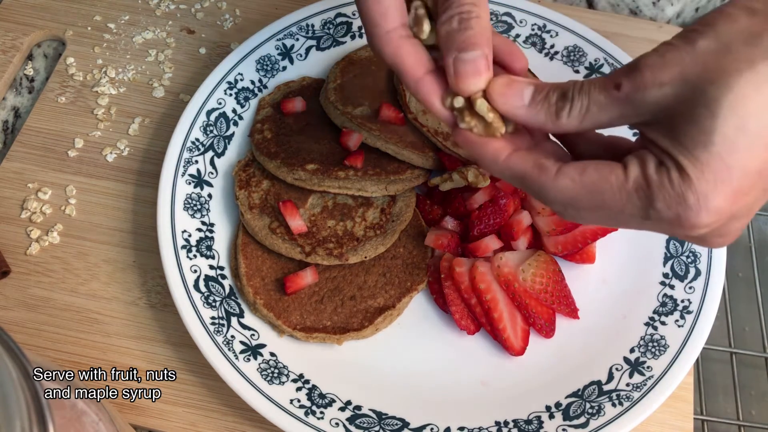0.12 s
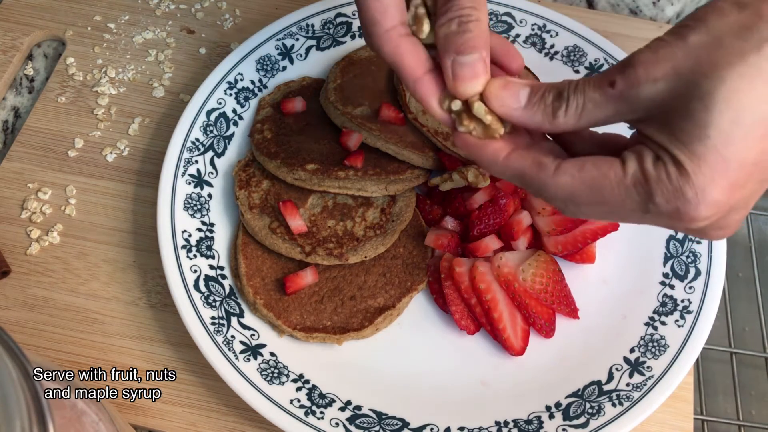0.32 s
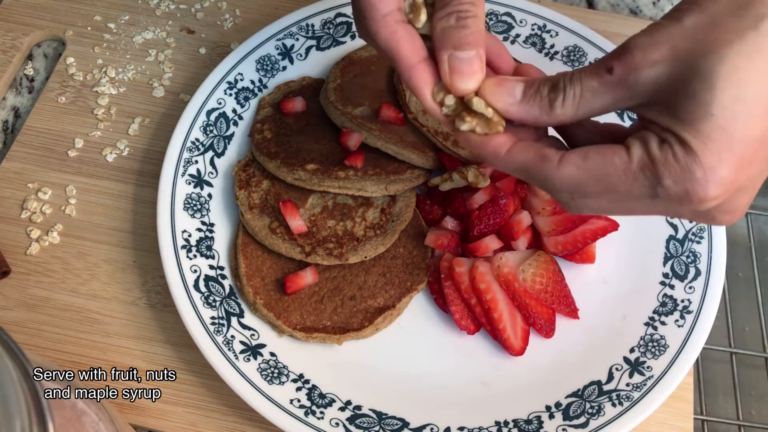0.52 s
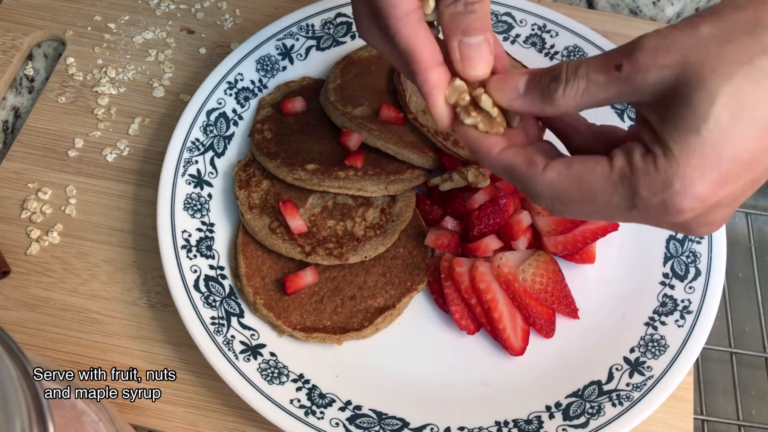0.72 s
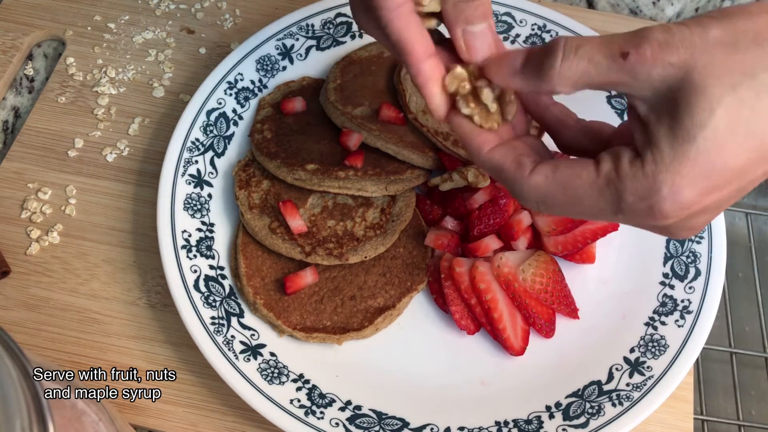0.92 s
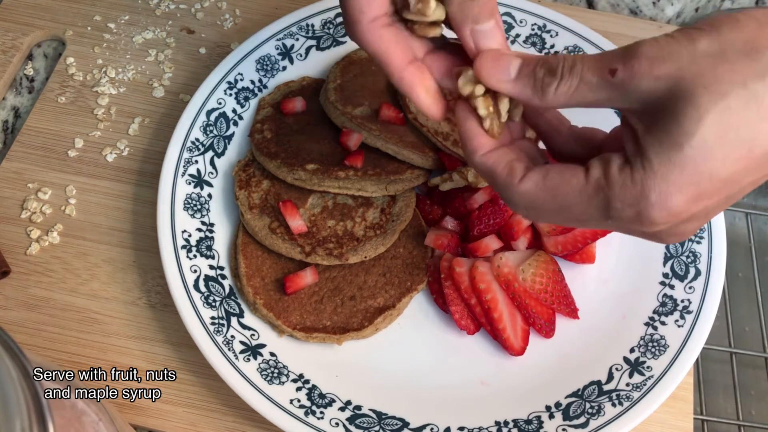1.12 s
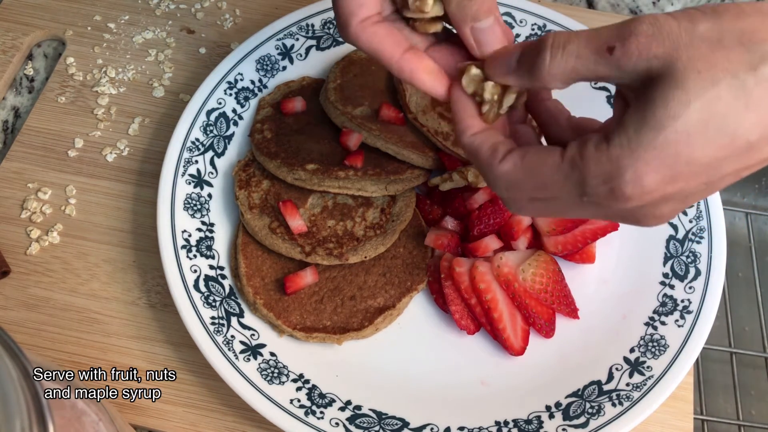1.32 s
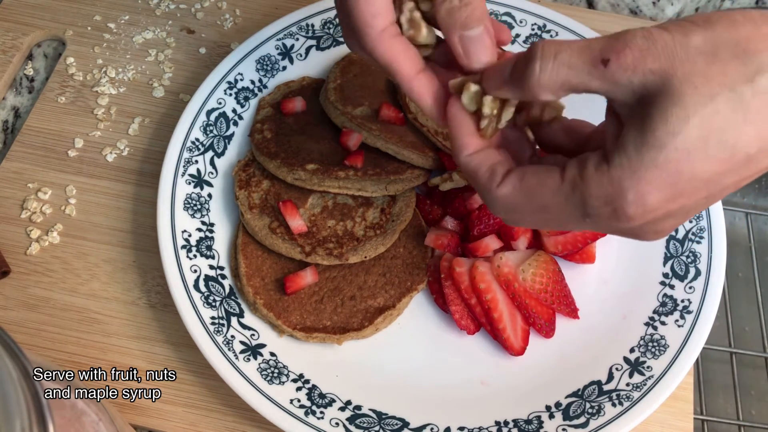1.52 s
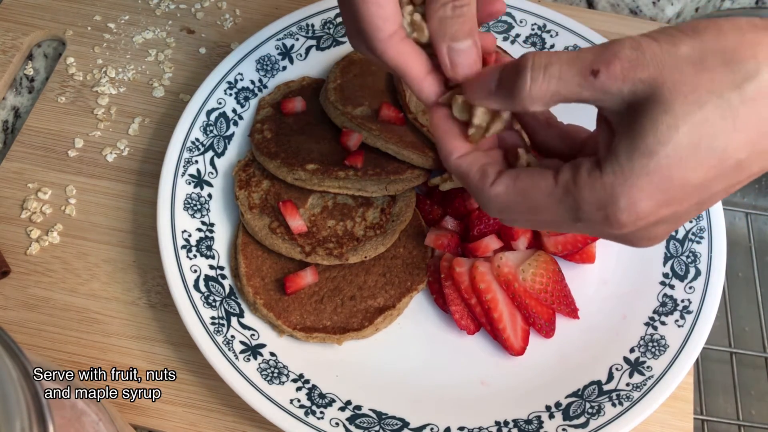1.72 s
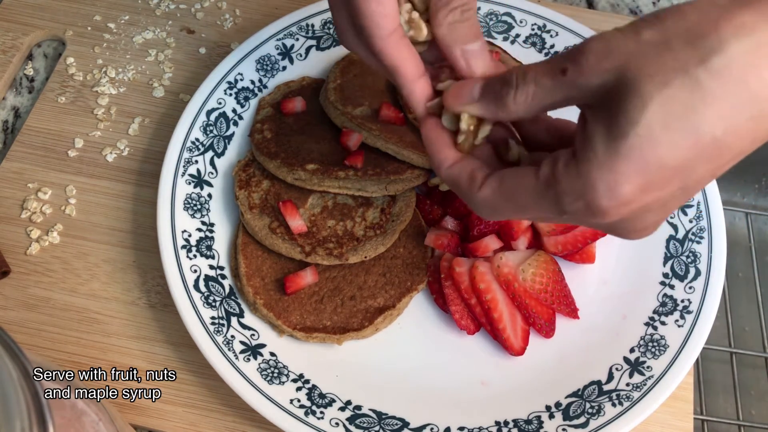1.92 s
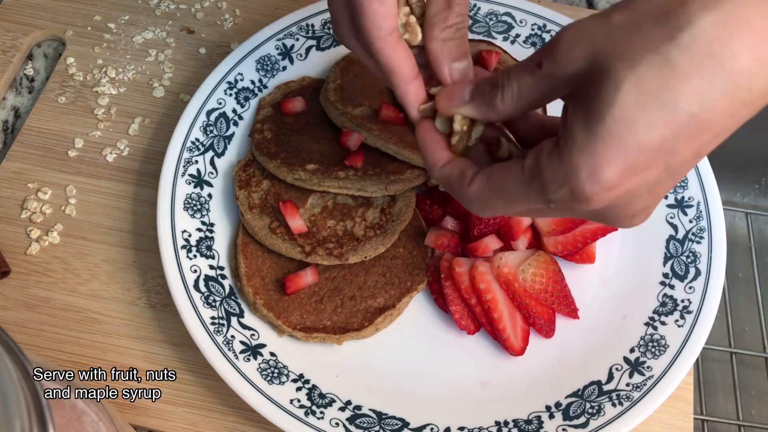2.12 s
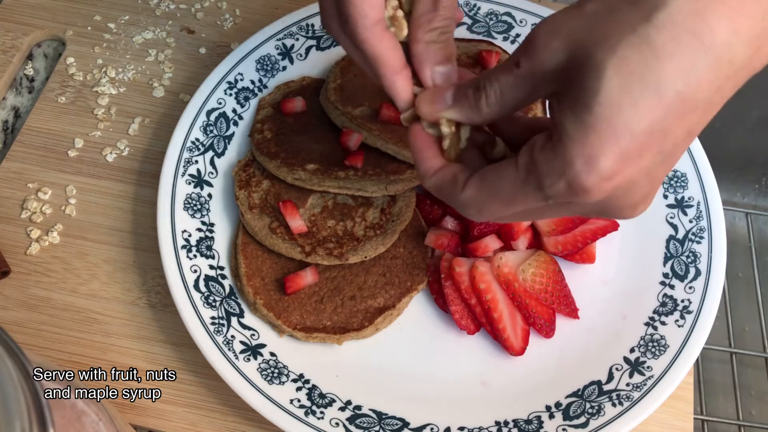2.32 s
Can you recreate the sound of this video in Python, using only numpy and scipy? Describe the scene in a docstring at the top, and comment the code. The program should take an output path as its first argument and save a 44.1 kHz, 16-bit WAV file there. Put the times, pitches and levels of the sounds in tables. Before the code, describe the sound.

Dry, bright cracks of nut kernels broken by hand, close up, in a quiet kitchen

```python
"""In a quiet kitchen, fingers break walnut pieces over a plate of pancakes, close to the microphone.
Each break is a dying burst of tiny slips that rings the kernel; crumbs tick the same way, more softly.
Friction grains make the rubbing, and shaped noise a dull brush of the hand.
Hands, plate and room answer these sounds by convolution with decaying noise.
Filtered noise and sines supply a low rumble, faint hiss, mains hum and soft low tones."""
import sys
import numpy as np
from scipy import signal
from scipy.fft import rfft, irfft
from scipy.io import wavfile
from scipy.ndimage import uniform_filter1d

SR = 44100
rng = np.random.default_rng(int(sys.argv[2]) if len(sys.argv) > 2 else 0)


def file_out(sig):
    """Save sig as 16-bit WAV at sys.argv[1]."""
    # one column per channel
    cols = np.atleast_2d(sig).T
    # limit, then scale
    lim = np.clip(cols, -1, 1)
    pcm = np.round(lim * 32767).astype(np.int16)
    wavfile.write(sys.argv[1], SR, pcm)


N = 110250  # length [samples]
CRUMB_KNOCK_DB = -2.5  # low-shelf gain shared by crumb ticks and rubbing


def amp(db):
    """Level law: decibels to amplitude gain."""
    return 10 ** (np.asarray(db) / 20)


def unit(x):
    """Power normalisation: scales to rms 1."""
    return x / np.sqrt(np.mean(x ** 2) + 1e-20)


def read(points, hz):
    """Interpolation of a spectrum on a log-frequency axis."""
    f, value = np.transpose(points)
    return np.interp(np.log(hz + 1), np.log(f + 1), value)


def add(mix, s, sound):
    """Superposition: adds a sound to the mix at time s."""
    part = mix[round(s * SR):][:len(sound)]
    part += sound[:len(part)]


def freqs(size):
    """Discrete Fourier analysis: the bin frequencies [Hz]."""
    return np.fft.rfftfreq(size, 1 / SR)


def colour(x, db):
    """Minimum-phase filtering: the Hilbert transform of the log gain gives a causal phase."""
    log_gain = np.log(amp(np.r_[db, db[-2:0:-1]]))
    response = np.exp(np.conj(signal.hilbert(log_gain)))[:len(db)]
    return irfft(rfft(x) * response, len(x))


def noise(points):
    """Spectral shaping: steady Gaussian noise of a given colour and rms 1."""
    spectrum = rfft(rng.standard_normal(N))
    return unit(irfft(spectrum * amp(read(points, freqs(N))), N))


def room_tone():
    """Stationary background: coloured noise for rumble and hiss, steady sines for mains hum."""
    # relative spectral density of the air: (frequency [Hz], density [dB per Hz])
    air = [(10, 2), (25, -13.5), (50, -23), (100, -30), (200, -37.5), (350, -36.5), (600, -48),
           (1500, -51.5), (4000, -54), (10000, -50.5), (15500, -57), (16400, -65.5)]
    # mains hum: (frequency [Hz], rms level [dB])
    hum = [(120, -69.5), (241, -75.5)]
    air_db = -44.5  # rms
    t = np.arange(N) / SR
    out = amp(air_db) * noise(air)
    for hz, db in hum:
        out += amp(db) * np.sqrt(2) * np.sin(2 * np.pi * (hz * t + rng.random()))
    return out


def low_tones():
    """Damped oscillation: faint sines swell quickly and die away exponentially."""
    # low tones: (time [s], frequency [Hz], level before rise and decay [dB], t60 [s])
    tones = [(0, 362.4, -57.5, 0.59), (0, 422.5, -55.5, 0.31), (.88, 316.4, -60.5, 0.46),
             (.88, 385.6, -62, 0.32), (.9, 694, -61.5, 0.35), (.965, 380, -61, .45)]
    rise_s = 0.0056
    out, t = np.zeros(N), np.arange(SR) / SR
    for s, hz, db, t60 in tones:
        swell = 1 - np.exp(-t / rise_s)
        decay = np.exp(-np.log(1000) * t / t60)
        add(out, s, amp(db) * swell * decay * np.sin(2 * np.pi * hz * t))
    return out


def kernel(hz, body_db, knock_db, top_db, ring_hz):
    """Source-filter response of a nut piece [dB]: base colour, three shelves and one damped ring."""
    # base colour of a break: (frequency [Hz], gain [dB])
    nut = [(150, -46.5), (400, -29), (1100, -24), (1900, -19), (2550, -28), (3300, -14.5), (4200, -17),
           (5300, -6.5), (7000, 0.5), (7700, -2.5), (8500, 3), (10700, 7), (11700, 0), (15000, -4.5),
           (16500, -18.5)]
    body_hz, knock_hz, top_hz = 4500, 1400, 11690  # shelf corners
    ring_db, ring_width_hz = 4, 2100
    body = body_db / (1 + (hz / body_hz) ** 4)
    knock = knock_db / (1 + (hz / knock_hz) ** 4)
    top = top_db * (1 - 1 / (1 + (hz / top_hz) ** 10))
    ring = ring_db / (1 + ((hz - ring_hz) / ring_width_hz) ** 2)
    return read(nut, hz) + body + knock + top + ring


def snap(db, body_db, knock_db, top_db, ring_hz, decay_ms, size=2048):
    """Brittle fracture: decaying slips excite the piece, and hands and plate scatter the pulse."""
    rise_s = .00015  # a fracture takes a moment to run
    grit = 0.37  # log-amplitude spread of the slips
    near_db, near_delay_s, near_decay_s = -7.5, .001, .0055  # scattering, relative to the direct sound
    t = np.arange(size) / SR
    ms = np.arange(size) * 1000 / SR

    slips = rng.standard_normal(size)
    slips *= np.exp(grit * rng.standard_normal(size) - ms / decay_ms)
    slips *= 1 - np.exp(-(t + 1 / SR) / rise_s)

    # remove the broad unevenness of the slips, so that they excite all bands alike
    uneven_db = 10 * np.log10(uniform_filter1d(abs(rfft(slips)) ** 2, size=90) + 1e-9)
    piece_db = kernel(freqs(size), body_db, knock_db, top_db, ring_hz)
    # the level refers the direct sound's energy to one millisecond
    direct = amp(db) * unit(colour(slips, piece_db - uneven_db)) / np.sqrt(ms[-1])

    sparse = rng.random(size) < .2
    near = rng.standard_normal(size) * sparse * (t > near_delay_s) * np.exp(-t / near_decay_s)
    scattered = signal.fftconvolve(direct, unit(near) / np.sqrt(size))[:size]
    return direct + amp(near_db) * scattered


def crumbs():
    """Impact excitation: crumbs tick against each other, each with a ring of its own."""
    # ticks: (time [s], level over 1 ms [dB], mid body [dB], top treble [dB])
    ticks = [(0.014, -54, -3, 0), (0.0282, -44, 0, 7), (0.0436, -25, 8, 3), (0.099, -55, 0, 1),
             (.108, -46.5, 0, -5), (0.155, -54, 15, 0), (0.2943, -41, 15.5, 2), (0.5497, -33, 5, -4),
             (.6118, -33, 2, 2), (.6246, -39, 17, 1), (.628, -31.5, -4, 6), (.634, -35.5, 20, -3),
             (0.658, -29, 12, 5), (0.785, -50, -1.5, -3.5), (0.8318, -51, 8, -7), (0.969, -38.5, 12, 4),
             (1.022, -34, -6, 1), (1.2456, -40, -7, 5.5), (1.250, -31.5, -13, 12), (1.2662, -40, -2, -4),
             (1.2827, -30, 7, 9), (1.29, -35, -2, 23), (1.293, -32, -5.5, 16), (1.3328, -32.5, -8.5, 7),
             (1.3489, -31.5, 0, -2), (1.5484, -45.5, 6, 4), (1.630, -55.5, 4, 1.5), (1.646, -51, 2, -1.5),
             (1.6665, -53, 0, -3.5), (1.702, -56, -1, 5.5), (1.7693, -39, 2.5, 23.5),
             (1.7841, -50, 0, 14.5), (1.937, -50.5, -3.5, -2), (1.9545, -53, 0.5, -2),
             (1.9956, -37.5, 4, 6), (2.0486, -34, -5, 2.5), (2.0636, -49, -17, 6), (2.074, -49, -8, 6),
             (2.116, -45, 2, -1), (2.1251, -38, 14, 3), (2.1411, -32, -1, 0), (2.1723, -45, -15, 2),
             (2.1747, -45, -13, 0), (2.456, -40.5, 10, 11.5)]
    decay_ms, middle_ring_hz, ring_spread = 0.98, 10200, 0.25  # spread of the log frequency
    out = np.zeros(N)
    for s, db, body_db, top_db in ticks:
        ring_hz = middle_ring_hz * np.exp(ring_spread * rng.standard_normal())
        add(out, s, snap(db, body_db, CRUMB_KNOCK_DB, top_db, ring_hz, decay_ms))
    return out


def cracks():
    """Brittle fracture: the kernel breaks in short bursts of varied colour and damping."""
    # breaks: (time [s], level over 1 ms [dB], mid body [dB], low knock [dB], top treble [dB],
    #          ring [Hz], decay time constant [ms])
    breaks = [(0.034, -20, 6.5, -18, -23, 7800, 0.27), (0.0357, -22, 2.5, 20.5, 13.5, 10800, 0.63),
              (0.0472, -24, 5, -10, 11, 6750, 1.1), (0.052, -28, -4, -11, -23, 11100, 1.2),
              (0.0556, -23.5, -7, -2, -18, 6460, 1.2), (.0760, -30, 5, -10, 10, 12300, 0.74),
              (0.191, -18.5, -4.5, -2, 2, 6900, 1.5), (0.2145, -13, -3.5, -13, 6.5, 13700, 0.79),
              (0.2297, -11, -7, -4, 1.5, 9300, 0.83), (0.3284, 1, 0, 8, 0.5, 9440, 1.3),
              (0.3306, -3, -7, 8.5, -18, 7000, 0.65), (0.334, -2, -0.5, 7, -7, 9800, .7),
              (0.3363, -16, 13, 4, 3, 10600, 0.84), (0.5891, -22.5, 2, 0.5, -9, 8230, 2.5),
              (0.5978, -25, -5, 2, 2, 10200, 0.39), (0.604, -24, 0.5, -1, -3, 10100, 1.2),
              (0.6519, -22.5, 7.5, -17, -13, 8200, 2), (0.6726, -12.5, -9.5, 5.5, 4, 12920, 1.8),
              (.6884, -20, -11, -5, 6.5, 10430, 0.59), (0.7306, -26.5, -0.5, 4, 0.5, 10460, 0.6),
              (0.7531, -29.5, 9, -13, -2, 3756, 0.96), (2.1887, -18, 4.5, 5, 8, 5200, 0.78),
              (2.1967, -22, 2, 0, -7, 5200, 1.3), (2.1908, -15.5, 11.5, -3, -0.5, 10800, 2),
              (2.2071, -18.5, -3, 0, -3, 10900, 0.47), (2.2326, -16, -1.5, 12, 1, 5050, 0.38),
              (2.2360, -12, 3.5, 8, 6.5, 10900, 1.1), (2.2405, -18, 9.5, 8.5, 6, 8670, 0.67),
              (2.246, -28, 10, -10, -2.5, 10700, 0.47), (2.3783, -29.5, 4.5, -1.5, 11.5, 15000, 0.86),
              (2.382, -34, 13.5, -22, -12, 5150, 3.3)]
    out = np.zeros(N)
    for s, *row in breaks:
        add(out, s, snap(*row))
    return out


def room_tail(size=32768):
    """Diffuse reverberation: noise decays exponentially at a rate that depends on frequency."""
    # reverberation time: (frequency [Hz], t60 [s])
    decay_times = [(200, 1), (1000, 0.3), (4000, 0.25), (8000, 0.2447), (11000, 0.21), (16000, 0.44)]
    # relative colour of the tail: (frequency [Hz], gain [dB])
    tail_colour = [(200, 2), (1500, 1.5), (4000, 6), (8000, 2), (11000, -2.5), (16000, 0.5)]
    rise_s = 0.0037
    t = np.arange(size) / SR
    hz, when, z = signal.stft(rng.standard_normal(size), SR, nperseg=256)
    z = z * amp(read(tail_colour, hz)[:, None])
    z = z * np.exp(-np.log(1000) * when / read(decay_times, hz)[:, None])
    tail = signal.istft(z, SR)[1][:size]
    build_up = 1 - np.exp(-(t / rise_s) ** 2)
    return unit(tail * build_up) / np.sqrt(size)  # unit energy


def kitchen(x, count=5):
    """Diffuse reverberation: overlapping windows share the sound among noise tails for a smooth decay."""
    room_db, rotation_hz = -13, 90  # tail energy gain; rate of the window rotation
    phase = np.pi * rotation_hz * np.arange(N) / SR
    windows = np.cos(phase + np.pi * np.arange(count)[:, None] / count) ** 4
    windows = windows / np.linalg.norm(windows, axis=0)  # constant total power
    tails = sum(signal.fftconvolve(x * window, room_tail())[:N] for window in windows)
    return x + amp(room_db) * tails


def rubbing():
    """Friction noise: random fine grains swell and fade as the fingers rub the kernel."""
    # strokes: (time [s], length [s], rms level at the middle [dB])
    strokes = [(0.578, 0.079, -39.5), (0.869, 0.083, -62.5), (0.949, .035, -53), (1.044, .06, -64),
               (1.151, .075, -56.5), (1.223, 0.078, -55), (1.402, .05, -64.5), (1.514, 0.27, -71.5),
               (1.78, .09, -68.5), (2.018, 0.091, -60.5)]
    grains_per_s, spread_db = 3600, 6.5  # spread: scale of the exponential draw
    body_db, top_db = 10.5, 5
    skin_hz, skin_width_hz, skin_gain_db = 10300, 600, 7.5  # band that friction draws from the nut's skin
    press, hz = np.zeros(N), freqs(N)
    for s, length, db in strokes:
        add(press, s, amp(db) * np.sqrt(np.hanning(round(length * SR))))
    grains = (rng.random(N) < grains_per_s / SR) * rng.choice([-1, 1], N)
    grains = grains * amp(spread_db * np.minimum(rng.exponential(1, N), 4))
    skin_db = skin_gain_db / (1 + ((hz - skin_hz) / skin_width_hz) ** 2)
    piece_db = kernel(hz, body_db, CRUMB_KNOCK_DB, top_db, skin_hz)
    return press * unit(colour(grains, piece_db + skin_db))


def brush():
    """Amplitude modulation: dull noise of a brushing hand swells and dies away."""
    # relative colour of the brush: (frequency [Hz], gain [dB])
    brush_colour = [(150, -23), (280, -9.5), (380, 2), (520, -14), (700, -11), (950, -27.5), (1400, -14),
                    (2200, -25), (3200, -22), (6000, -47.5)]
    start_s, rise_s, peak_db = .868, 0.034, -60
    u = np.maximum(np.arange(N) / SR - start_s, 0) / rise_s
    swell = u * np.exp(1 - u)  # peaks at 1 after the rise time
    return amp(peak_db) * swell * noise(brush_colour)


def scene():
    """Superposition: nuts and fingers sound in the room, over the background."""
    sources = crumbs() + cracks() + rubbing() + brush()
    return (kitchen(sources) + low_tones() + room_tone())[None]


def record(dry):
    """Amplitude limiting: the input stage clips peaks, then a low-pass filter limits the band."""
    overload, edge_hz = 0.86, 16300  # clipping amplitude; band edge
    edge = signal.firwin(255, edge_hz, window=("kaiser", 7), fs=SR)
    fine = signal.resample_poly(dry, 4, 1, axis=1)  # oversampling reduces aliasing from the clipping
    held = np.clip(fine, -overload, overload)
    clipped = signal.resample_poly(held, 1, 4, axis=1)
    return signal.oaconvolve(clipped, edge[None], "same")


dry = scene()
out = record(dry)
file_out(out)
```